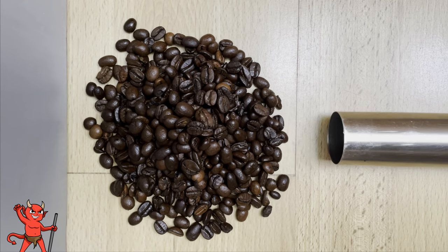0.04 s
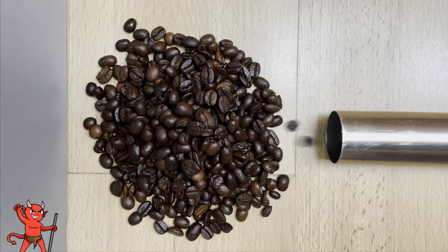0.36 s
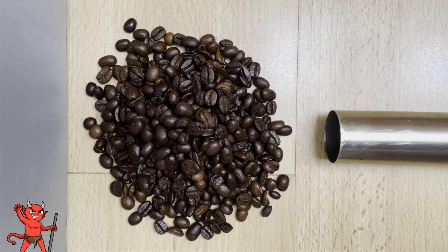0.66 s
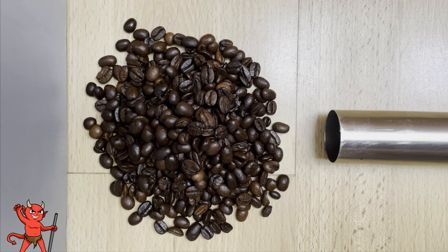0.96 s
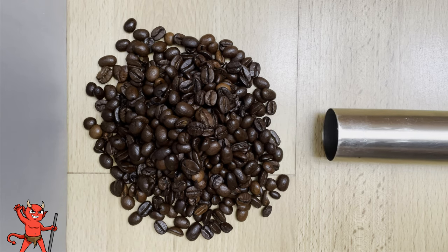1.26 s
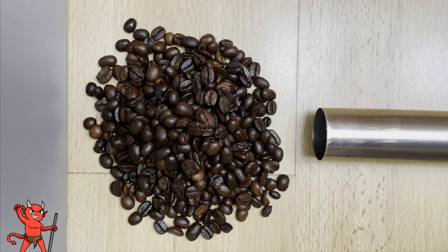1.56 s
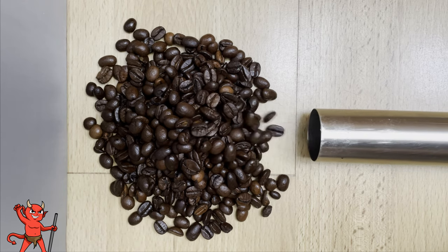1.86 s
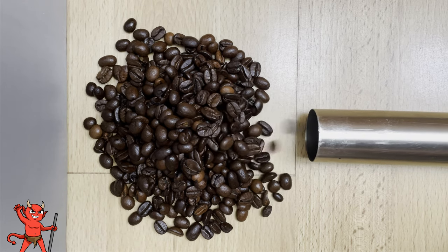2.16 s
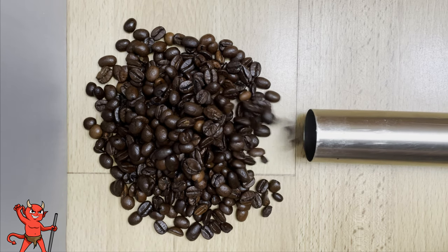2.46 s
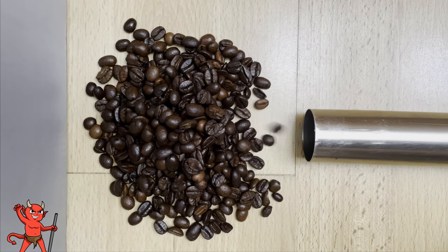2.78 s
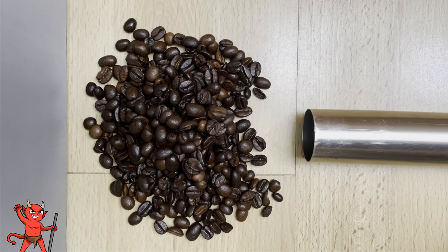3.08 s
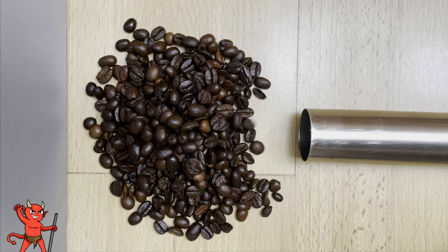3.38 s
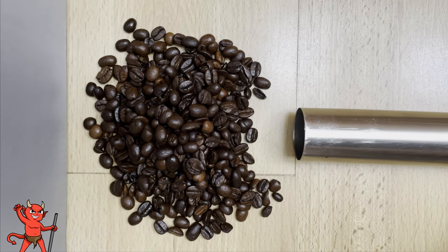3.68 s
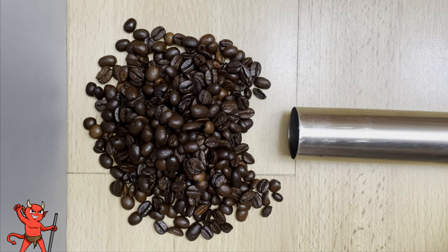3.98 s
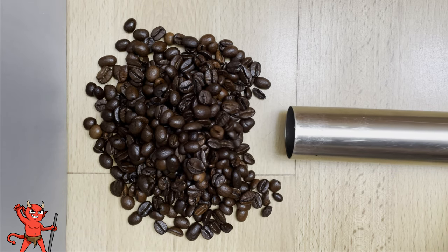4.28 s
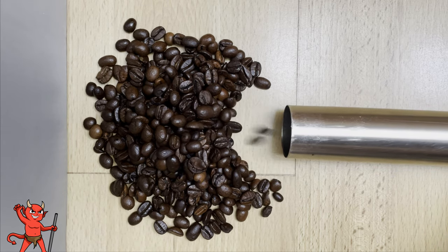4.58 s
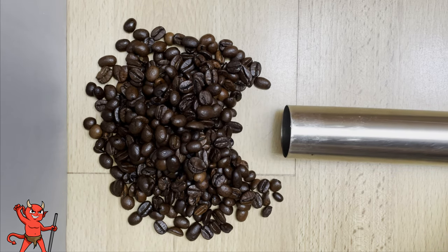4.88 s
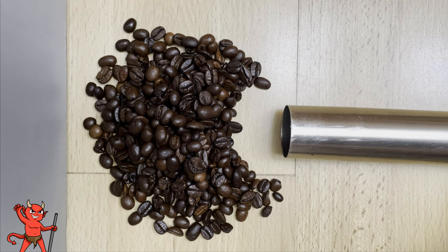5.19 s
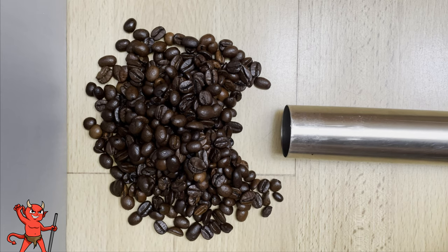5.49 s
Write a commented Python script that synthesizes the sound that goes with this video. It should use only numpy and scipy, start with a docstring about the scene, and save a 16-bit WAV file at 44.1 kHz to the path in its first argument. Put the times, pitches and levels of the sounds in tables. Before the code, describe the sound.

Over a soft rush of air, a vacuum tube sucks up coffee beans in clumps, with gritty scrapes, sharp clicks and clatter.

```python
"""Over a faint, steady hiss of air, roasted coffee beans slide, click and rattle away in bursts.
A vacuum cleaner's steel tube is creeping up to a heap of them on a hard floor, close by. The draught
drags the shells into a gritty scrape; they snap against each other and the rim, ringing the air in the
tube's mouth, then knock away up the tube. A small room answers.
A faint, thin, high tone is heard near the end."""
import sys
import numpy as np
from scipy import signal
from scipy.fft import rfft, irfft, next_fast_len
from scipy.io import wavfile
from scipy.ndimage import map_coordinates

SR = 44100
rng = np.random.default_rng(int(sys.argv[2]) if len(sys.argv) > 2 else 0)


def wav_out(sig):
    """Save sig, one row per channel (or a flat mono array), as 16-bit PCM at SR to the path in sys.argv[1]."""
    wavfile.write(sys.argv[1], SR, np.round(np.clip(np.atleast_2d(sig).T, -1, 1) * 32767).astype(np.int16))


N = 253134

# The tone colour of a hard shell contact. Each row: frequency in Hz, level in dB.
SHELL_COLOUR = [(100, -20), (900, 8), (2800, -2.5), (4000, 1.5), (7000, -2.5), (10000, -2.5), (16000, -4)]
MOUTH_HZ, MOUTH_WIDTH_HZ, MOUTH_DB = 5270, 1030, 8.1  # cross resonance of the air in the tube's mouth


def amp(db):
    """Decibels to gain."""
    return 10 ** (np.asarray(db) / 20)


def unit(x):
    """Scale to rms 1."""
    return x / np.sqrt(np.mean(x ** 2) + 1e-20)


def together(levels):
    """Level in dB of unrelated sounds heard at once."""
    return 10 * np.log10(sum(amp(db) ** 2 for db in levels))


def along(points, hz):
    """Read (Hz, value) points on a log frequency axis."""
    f, v = np.transpose(points)
    return np.interp(np.log(hz + 1), np.log(f + 1), v)


def wobble(rate):
    """A smooth random curve, rate knots a second."""
    return map_coordinates(rng.standard_normal(N // 20), [np.arange(N) * rate / SR], mode="wrap")


def burst(start, length, rise, fall):
    """An attack, hold and release envelope in dB; rise and fall in dB a second."""
    t = np.arange(N) / SR - start
    return np.maximum(rise * np.minimum(t, 0) - fall * np.maximum(t - length, 0), -120)


def filtered(x, response):
    """Pass x through a complex frequency response."""
    size = next_fast_len(N + SR // 2)
    return irfft(rfft(x, size) * response(np.fft.rfftfreq(size, 1 / SR)), size)[..., :N]


def resonance(f, hz, width):
    """A causal resonance of peak gain 1."""
    return 1j * f * width / (hz * hz - f * f + 1j * f * width)


def minimum_phase(gain):
    """The causal response with the given magnitudes."""
    cepstrum = irfft(np.log(np.maximum(gain, 1e-6)))
    half = len(cepstrum) // 2
    cepstrum[1:half] *= 2
    cepstrum[half + 1:] = 0
    return np.exp(rfft(cepstrum))


def stereo_noise(response):
    """Coloured noise of rms 1, narrow in the bass and wider in the treble."""
    # How alike the two sides are. Each row: frequency in Hz, left-right correlation.
    likeness = [(100, 0.8), (600, 0.84), (1400, 0.49), (3000, -.1), (6000, 0.51), (15000, 0)]
    angle = lambda f: np.arccos(np.clip(along(likeness, f), -1, 1)) / 2
    white = rng.standard_normal((2, N))
    mid, side = filtered(white, lambda f: response(f) * [np.cos(angle(f)), np.sin(angle(f))])
    return unit(np.array([mid + side, mid - side]))


def contacts(times, db, pan_db, response, lag_s, size):
    """Place short stereo hits, each with the energy of 1 ms at its level in dB."""
    f = np.fft.rfftfreq(size, 1 / SR)
    side = np.array([1, -1])[:, None, None]
    lag = lag_s * np.tanh(pan_db / 10 + rng.standard_normal(len(times)))[:, None]
    lead = size // 32  # samples of space for the side that arrives first
    hits = irfft(response(f) * np.exp(-2j * np.pi * f * (lead / SR - side * lag / 2)))
    energy = np.sum(hits ** 2, axis=2, keepdims=True) / (SR / 1000)
    share = 2 / (1 + amp(-side * pan_db[:, None]) ** 2)
    hits = hits * amp(db)[:, None] * np.sqrt(share / energy)
    at = np.maximum(np.round(times * SR).astype(int)[:, None] - lead + np.arange(size), 0)
    return np.array([np.bincount(at.ravel(), channel.ravel(), N)[:N] for channel in hits])


def shower(level, rate, crowding, scatter_db, count):
    """Times, levels and pans of random contacts: rate a second at -40 dB, denser when louder."""
    jitter = rng.random(count)
    weight, side = np.clip(rng.standard_normal((count, 2)), -2, 2).T
    times = (np.arange(count) + jitter) / count * N / SR
    level_now = level[(times * SR).astype(int)]
    max_rate = count * SR / N
    density = np.minimum(rate * (1 + amp(crowding * (level_now + 40))) / 2, max_rate)
    db = level_now + 20 * np.log10(unit(amp(scatter_db * weight))) - 10 * np.log10(density / 1000)
    arrivals = np.floor(np.cumsum(2 * rng.random(count) * density / max_rate))
    keep = np.diff(arrivals, prepend=0) > 0  # beans follow at uneven gaps
    return times[keep], db[keep], (1.2 + 5 * side)[keep]


def draught(air_db=-53.0):
    """Steady air rushes into the mouth and makes the tube's air column sing."""
    # The colour of rushing air. Each row: frequency in Hz, relative spectral level in dB.
    air_colour = [(40, -44), (100, -21.5), (200, -7.5), (500, -6), (1300, -3), (2800, -16), (4700, -4),
                  (7000, -13), (11000, -21), (16000, -25)]
    # The air column's resonances. Each row: frequency in Hz, width in Hz, gain in dB.
    pipe_modes = [(261, 26, 1), (565, 5, 10), (864, 14, 4), (1160, 16, -2)]
    column = lambda f: 1 + sum(amp(db) * resonance(f, hz, width) for hz, width, db in pipe_modes)
    return amp(air_db) * stereo_noise(lambda f: amp(along(air_colour, f)) * column(f))


def slide_shape(start, length, swell_db=4):
    """A slide's envelope in dB: dragged beans hiss louder as they speed up, then die away."""
    swell = np.interp(np.arange(N) / SR, [start, start + length], [-swell_db, 0])
    return swell + burst(start, length, rise=328.5, fall=140.5)


def mouth(f, direct_db):
    """Sound made near the mouth arrives directly and as the mouth's short ring."""
    return amp(direct_db) + amp(MOUTH_DB) * resonance(f, MOUTH_HZ, MOUTH_WIDTH_HZ)


def clicks(times, db, pan_db, pitch_hz, spread, damping, direct_db, shadow=0.083):
    """Each shell gives one sharp snap, mirrored by the hard floor, and sets the mouth ringing."""
    chance = np.clip(rng.standard_normal((len(times), 5)), -2, 2).T[:, :, None]
    hz = np.reshape(pitch_hz, (-1, 1)) * np.exp(spread * (chance[0] + chance[1:3] / 2))
    direct = (direct_db + shadow * np.array([pan_db, -pan_db]))[..., None]  # less snap on the far side
    echo_s = 0.0004 * np.exp(chance[3:] / 2)

    def snap(f):
        shell = resonance(f, hz, damping * hz) * minimum_phase(amp(along(SHELL_COLOUR, f)))
        floor_bounce = 1 + 0.5 * np.exp(-2j * np.pi * f * echo_s)
        return shell * mouth(f, direct) * floor_bounce
    return contacts(times, db, pan_db, snap, lag_s=0.00019, size=256)


def sliding(level, gain_db=-5.5, pitch_hz=8500, width_hz=12000, direct_db=7):
    """Shells scrape over the floor and along the steel: a gritty hiss with a crackle of crisp ticks."""
    level = level + gain_db
    grit = unit(amp(2.9 * wobble(700) + 2 * wobble(70)))
    scrape = lambda f: amp(along(SHELL_COLOUR, f)) * resonance(f, pitch_hz, width_hz)
    hiss = stereo_noise(lambda f: scrape(f) * mouth(f, direct_db))
    ticks = shower(level - 1, rate=400, crowding=0.5, scatter_db=3.5, count=4500)
    crackle = clicks(*ticks, pitch_hz, spread=0.2, damping=0.47, direct_db=direct_db)
    lean_left = amp([[2.1], [-2.1]])
    return amp(level) * grit * hiss * lean_left + crackle


def knocks(times, db, pan_db, soft_hz=2600):
    """Each blow rings all the modes of tube and floor at once, at new strengths and pitches."""
    # The tube and floor under a blow. Each row: frequency in Hz, width in Hz, relative level in dB.
    body_modes = [(185, 112, -13), (650, 132, -1), (910, 430, -9.5), (1510, 430, -3.5), (1890, 430, -1.5)]
    chance = rng.standard_normal((len(times), len(body_modes), 3))
    chance = np.clip(chance, -2, 2).transpose(1, 2, 0)[..., None]
    modes = lambda f: sum(amp(level + 2 * draw[1:]) * resonance(f, hz + 0.53 * width * draw[0], width)
                          for (hz, width, level), draw in zip(body_modes, chance))
    ring = lambda f: modes(f) / (1 + 1j * f / soft_hz)  # a longer contact holds little treble
    # Long waves reach both sides more evenly, so the pan is halved.
    return contacts(times, db, pan_db / 2, ring, lag_s=0.00017, size=768)


def strikes(pitch_hz=6200, direct_db=1.5, dulling=0.043):
    """Single beans hit the rim: a glancing touch ticks brightly, a full blow knocks and clicks lower."""
    # Hard blows near the mouth. Each row: start in seconds, click level and knock level in dB
    # over 1 ms, the click's pan in dB of left over right.
    blows = [(0.1197, -35.5, -61, 5), (0.1466, -30, -61.5, 8), (0.2383, -23, -34, 7.5),
             (0.247, -20.5, -40, -11), (0.261, -22, -28, -0.5), (0.269, -26, -45, -6.5),
             (0.2953, -28, -42, 1), (0.3056, -35, -63, 6), (0.322, -27.5, -32.5, 9), (0.3248, -26, -52, 3),
             (0.3305, -28, -35, -8), (0.3356, -24, -34, -10), (0.3543, -31, -49, -13),
             (0.6653, -24.5, -39, 15), (0.6811, -27.5, -51, -9), (0.7235, -27.5, -35, -5),
             (0.7456, -23, -53, -4), (0.7757, -41, -39, 0), (0.9422, -31.5, -57, 5), (0.9816, -25, -54, 4),
             (0.9949, -29, -36.5, 11), (1.0033, -27, -39, 7), (1.0073, -26, -33.5, 4),
             (1.018, -35, -47, -13), (1.0407, -34, -44, -11), (1.3038, -36, -53, 14),
             (1.3166, -32.5, -46, 10), (1.331, -30, -40, 18), (1.3415, -24.5, -36, 7.5),
             (1.3477, -28.5, -35, 7), (1.3588, -33, -36.5, 6), (1.3661, -34, -35.5, 0),
             (1.388, -29.5, -68, -2), (1.4311, -28, -45.5, -2.5), (1.447, -30, -57, -1),
             (1.728, -37, -92, -15), (2.0935, -23.5, -39, 11), (2.157, -25, -39, 7), (2.2049, -31, -33, 0),
             (2.261, -23.5, -40, 20), (2.2724, -29, -28, -4.5), (2.3098, -25, -32.5, 8.5),
             (2.3605, -29, -30.5, 6), (2.385, -25, -44, 6.5), (2.4283, -24.5, -32.5, 9),
             (2.4951, -24.5, -32, 4), (2.5843, -24, -32, 3), (2.7261, -33, -28.5, 14),
             (2.9162, -23, -33, -3.5), (2.98, -25.5, -27.5, -1), (3.0948, -26, -41, 6),
             (3.157, -36, -30.5, 4), (3.2107, -29.5, -32.5, -3), (3.2888, -29.5, -42, 8.5),
             (3.297, -24.5, -33.5, 14), (3.3067, -37, -35, 2), (3.5544, -32.5, -61, 11),
             (3.6141, -29.5, -48, 9.5), (3.6295, -27, -48, 4.5), (3.636, -26.5, -39.5, 18),
             (3.657, -26.5, -40, 7.5), (3.678, -33, -35.5, -3), (3.6929, -21.5, -55, 5),
             (3.7071, -27.5, -42, -2), (3.7991, -32, -49, 7), (3.8125, -33, -47, 2), (3.8224, -28, -44, 9),
             (3.8371, -23.5, -41, 1), (3.8428, -26, -25.5, 9), (3.872, -33, -36, -10),
             (3.8836, -37, -55, -8), (3.9133, -34.5, -49, -8), (4.2919, -37, -53, 12),
             (4.3201, -34, -43, 13), (4.3716, -36.5, -40.5, 8), (4.4, -33, -40, -7), (4.4263, -33, -46, -5),
             (4.7262, -25, -58, 13), (4.853, -23.5, -34, 5), (4.954, -27, -41, 5), (4.9739, -25.5, -29, 10),
             (4.9849, -32, -38.5, -12), (4.9927, -24, -35, -0.5), (5.0087, -28, -36.5, -11)]
    times, click_db, knock_db, pan_db = np.transpose(blows)
    fullness = np.clip(knock_db - click_db - np.mean(knock_db - click_db), -10, 10)
    hz = pitch_hz * np.exp(-dulling * fullness)
    direct = direct_db + (click_db - np.mean(click_db)) / 2  # faint hits lie deeper in the tube
    snaps = clicks(times, click_db, pan_db, hz, spread=0.1, damping=0.7, direct_db=direct)
    return snaps + knocks(times, knock_db, pan_db)


def gulp_shape(start, length, recede_db=-7.5):
    """A gulp's envelope in dB: a clump crashes through the mouth, then rattles faintly up the tube."""
    crash = burst(start, length, rise=950, fall=519.5)
    receding = burst(start, length, rise=950, fall=70.5) + recede_db
    return np.maximum(crash, receding)


def clatter(level, slide_level, hiding=0.22, open_db=-37):
    """Beans jostle on the heap; once it rests, those in the tube click on through the mouth's ring."""
    times, db, pan_db = shower(level, rate=215, crowding=1.8, scatter_db=2.6, count=3500)
    direct = np.minimum(hiding * (slide_level[(times * SR).astype(int)] - open_db), 0) - 1
    return clicks(times, db, pan_db, pitch_hz=5910, spread=0.31, damping=0.8, direct_db=direct)


def knocking(level, gain_db=-1):
    """Beans bounce from wall to wall up the tube."""
    return knocks(*shower(level + gain_db, rate=700, crowding=0.5, scatter_db=5.5, count=2500))


def bean_flow(jostle_db=-10.5):
    """Envelopes in dB for sliding, clatter and knocking, as beans are dragged in and swallowed."""
    # The draught drags beans over the floor. Each row: start and length in seconds,
    # relative level in dB at the end of the slide.
    slides = [(0.119, 0.14, -41.5), (0.514, 0.1, -47.5), (0.645, 0.11, -36), (0.823, 0.16, -41.5),
              (1.132, 0.084, -44.5), (1.334, 0.12, -49.5), (1.486, 0.11, -54), (1.966, 0.14, -37),
              (2.199, 0.33, -36.5), (2.555, 0.081, -41.5), (2.69, 0.075, -32), (2.8, .16, -36),
              (2.969, 0.25, -36), (3.295, .22, -47), (3.549, 0.19, -45), (4.037, 0.2, -47),
              (4.638, 0.064, -39), (4.727, 0.12, -32), (4.944, 0.38, -49.5)]
    # The tube swallows a clump. Each row: start and length in seconds, relative levels in dB
    # of the clatter and of the knocking.
    gulps = [(0.245, .03, -36.5, -52), (0.735, 0.035, -36, -50), (1.003, 0.04, -44.5, -57),
             (2.08, 0.055, -32.5, -45.5), (2.185, 0.04, -37.5, -49), (2.284, 0.22, -36, -48.5),
             (2.591, 0.024, -37.5, -46.5), (2.67, 0.05, -39.5, -50), (2.744, 0.26, -33, -43),
             (3.045, 0.11, -36, -44.5), (3.196, 0.04, -35.5, -46.5), (3.643, 0.087, -44, -58.5),
             (3.898, 0.065, -46.5, -64.5), (4.267, 0.085, -46.5, -59.5), (4.795, 0.07, -33, -43),
             (4.892, 0.052, -42, -60), (4.975, 0.065, -43.5, -55.5)]
    stray_slide_db, stray_clatter_db, stray_knock_db = -86, -77, -70  # loose beans between bursts
    drag = together(db + slide_shape(start, length) for start, length, db in slides)
    rattle = together(db + gulp_shape(start, length) for start, length, db, _ in gulps)
    knock = together(db + gulp_shape(start, length) for start, length, _, db in gulps)
    return (together([drag, stray_slide_db]),
            together([rattle, drag + jostle_db, stray_clatter_db]),
            together([knock, stray_knock_db]))


def room(x, predelay_samples=130):
    """A small room adds a diffuse tail on each side, the treble dying first."""
    # The room's decay. Each row: frequency in Hz, time to fall 60 dB in seconds.
    decay_times = [(200, 1), (2000, 0.33), (12000, 0.18)]
    hz, t, spectrum = signal.stft(rng.standard_normal((2, SR // 2)), SR, nperseg=256)
    decay = amp(-60 * t / along(decay_times, hz)[:, None])
    _, tail = signal.istft(spectrum * decay, SR, nperseg=256)
    tail = np.pad(tail / np.linalg.norm(tail[0]), ((0, 0), (predelay_samples, 0)))
    return signal.fftconvolve(x, tail, axes=1)[:, :N]


def high_tone(start_s=4.35, length_s=1.4, hz=9044, db=-76.5, waver=0.0005404):
    """A faint, thin, barely wavering high tone near the end."""
    phase = 2 * np.pi * hz * np.cumsum(1 + waver * wobble(5.8)) / SR
    return amp(db + burst(start_s, length_s, rise=200, fall=200)) * np.sqrt(2) * np.sin(phase)


def scene(room_db=-16, tube_db=-12, clump_db=1.14):
    """Beans come in clumps over the draught, lingering in the room and, at the mouth's pitch, the tube."""
    slide, jostle, knock = bean_flow()
    clumps = clump_db * wobble(40)
    beans = (strikes() + clatter(jostle + clumps, slide)
             + knocking(knock + clumps) + sliding(slide + clumps))
    tail_colour = lambda f: amp(room_db) + amp(tube_db) * resonance(f, MOUTH_HZ, MOUTH_WIDTH_HZ)
    return beans + filtered(room(beans), tail_colour) + draught() + high_tone()


def record(dry, top_hz=15850):
    """A brick-wall low-pass cuts the very top of the treble."""
    return filtered(dry, lambda f: f < top_hz)


dry = scene()
out = record(dry)
wav_out(out)
```